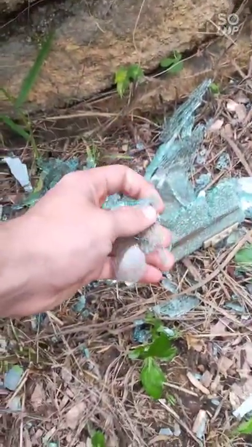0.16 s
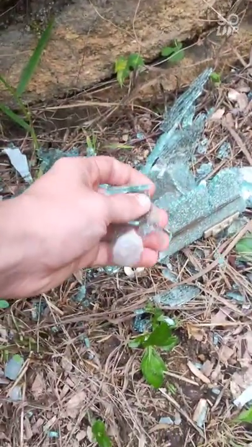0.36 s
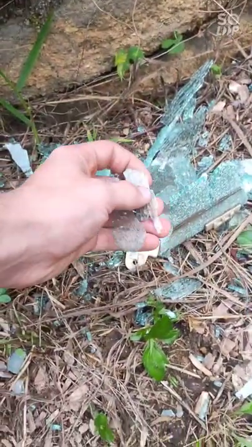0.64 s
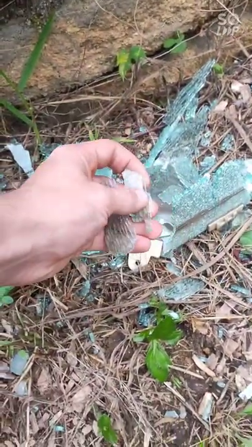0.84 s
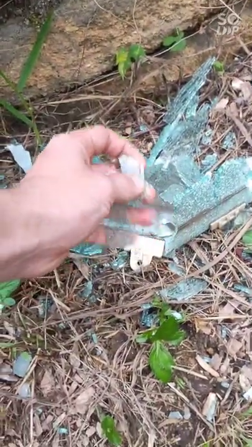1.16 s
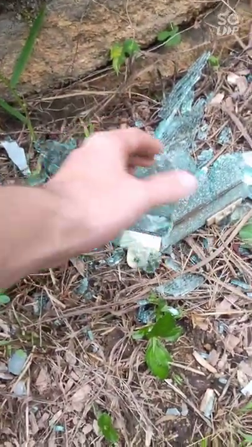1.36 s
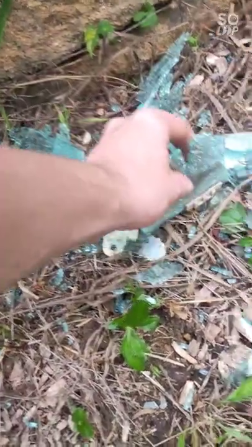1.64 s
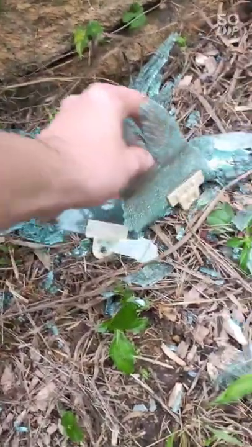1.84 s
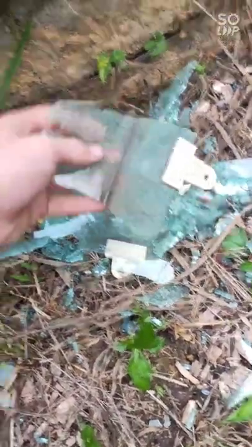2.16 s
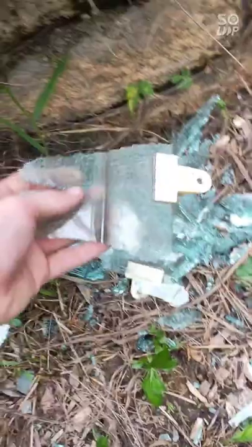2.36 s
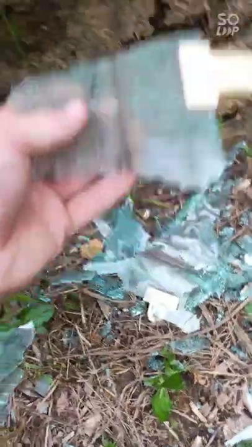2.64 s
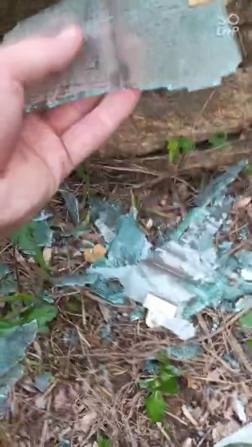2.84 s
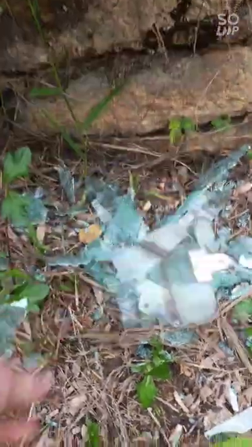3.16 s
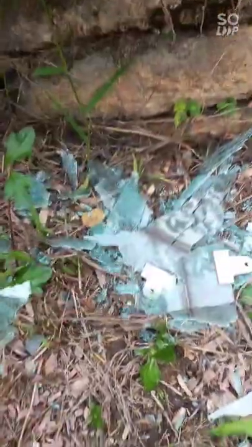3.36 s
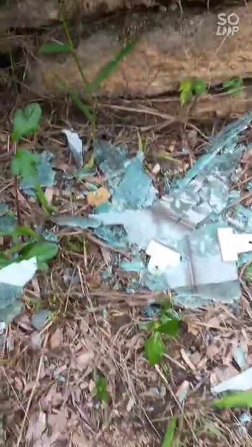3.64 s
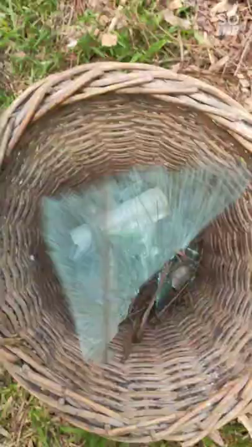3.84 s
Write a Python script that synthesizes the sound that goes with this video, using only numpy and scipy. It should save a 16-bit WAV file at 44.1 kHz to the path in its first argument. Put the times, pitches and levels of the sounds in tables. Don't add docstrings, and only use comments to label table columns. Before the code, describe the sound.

Broken laminated glass crackles in a hand close to the microphone outdoors, drops clinking onto shards, then after quiet ticks a larger sheet smashes down and crumbs briefly settle.

```python
import sys
import numpy as np
from scipy import signal
from scipy.fft import rfft, irfft
from scipy.io import wavfile
from scipy.ndimage import uniform_filter1d, minimum_filter1d

SR = 44100
rng = np.random.default_rng(int(sys.argv[2]) if len(sys.argv) > 2 else 0)


def makeup_ratio(level_db):
    decades = np.asarray(level_db, float) / 20
    return 10 ** decades


def log_audio(samples):
    frames = np.atleast_2d(samples).T
    limited = np.clip(frames, -1, 1)
    pcm = np.round(limited * 32767).astype(np.int16)
    wavfile.write(sys.argv[1], SR, pcm)


N = 176400
PIECE = 4000


def rms_one(x):
    return x / np.sqrt(np.mean(x ** 2) + 1e-20)


def curve(rows, outside=None):
    s, db = np.transpose(rows)
    return np.interp(np.arange(N) / SR, s, db, outside, outside)


def band(x, low_hz, high_hz):
    return signal.sosfilt(signal.butter(3, [low_hz, high_hz], "band", fs=SR, output="sos"), x)


def colour(x, spectrum):
    hz, db = np.transpose(spectrum)
    grid_hz = np.maximum(np.arange(2049) * SR / 4096, 1)
    gain_db = np.interp(np.log(grid_hz), np.log(hz), db)
    cepstrum = irfft(np.log(makeup_ratio(gain_db)))
    cepstrum[1:2048] *= 2
    cepstrum[2049:] = 0
    kernel = irfft(np.exp(rfft(cepstrum)))
    kernel = kernel / np.sqrt(np.sum(kernel ** 2))
    if x.ndim > 1:
        kernel = kernel[None]
    return signal.fftconvolve(x, kernel, axes=-1)[..., :x.shape[-1]]


def ring(x, hz, t60_s):
    r = makeup_ratio(-60 / (t60_s * SR))
    w = 2 * np.pi * min(hz, 16000) / SR
    return signal.lfilter([0, np.sin(w)], [1, -2 * r * np.cos(w), r * r], x + 1e-18)


def grains(shape, per_s, spread_db):
    size = makeup_ratio(spread_db * np.minimum(rng.exponential(1, shape), 4))
    sign = rng.choice([-1, 1], shape)
    return rms_one(size * sign * (rng.random(shape) < per_s / SR))


def drift(hz):
    r = np.exp(-2 * np.pi * hz / SR)
    noise = rng.standard_normal(N + SR)
    return rms_one(signal.lfilter([1], [1, -2 * r, r * r], noise)[SR:])


def pair(alike):
    mid, side = rng.standard_normal((2, N))
    return np.sqrt((1 + alike) / 2) * mid + np.sqrt((1 - alike) / 2) * side * np.array([[1], [-1]])


def place(pieces):
    out = np.zeros(N + PIECE)
    for s, db, sound in pieces:
        start = int(s * SR)
        out[start:start + PIECE] += makeup_ratio(db) * sound / np.abs(sound).max()
    return out[:N]


def port(x, bumps):
    for hz, width_hz, db in bumps:
        a, w = makeup_ratio(db / 2), 2 * np.pi * hz / SR
        al, c = np.sin(w) * width_hz / hz / 2, -2 * np.cos(w)
        x = signal.lfilter([1 + al * a, c, 1 - al * a], [1 + al / a, c, 1 - al / a], x)
    return x


# centre in Hz, width in Hz, level in dB.
RIGHT_PORT_BUMPS = [(230, 400, 3.5), (4300, 1900, -8), (6570, 3340, 13.5), (12300, 5900, 4.5)]


def ports(left, right):
    left_db = 4
    return np.array([makeup_ratio(left_db) * left, makeup_ratio(-left_db) * port(right, RIGHT_PORT_BUMPS)])


# frequency in Hz, level in dB.
HISS_SPECTRUM = [(59, -14), (100, -6), (166, -12.5), (452, -12), (1330, -18), (2320, -15), (2520, -17),
                 (13200, -30.5), (16000, -44.5)]
# time in seconds, level in dB.
HISS_SWELL = [(0, 3), (3.3, 4.5), (3.8, 0)]
# time in seconds, level in dB.
BREEZE_GUSTS = [(0, -68.5), (.25, -59.5), (.32, -67), (.42, -50.5), (.6, -69), (1.0, -62.5), (1.55, -69.5),
                (1.68, -54), (1.9, -71), (2.2, -62.5), (2.7, -77), (2.92, -63), (3.85, -75.5), (4, -69)]


def outdoors():
    hiss_db, split_hz = -73, 500
    chirr_db, chirr_hz, chirr_width_hz = -88, 2280, 150
    breeze_top_hz, breeze_left_db = 48, 3.0
    hiss = band(pair(.85), 40, split_hz) + band(pair(0.11), split_hz, 10000)
    hiss = hiss + makeup_ratio(1.7 * drift(5.9) - 4) * band(pair(0.74), 9100, 22000)
    hiss = makeup_ratio(hiss_db + curve(HISS_SWELL)) * colour(hiss, HISS_SPECTRUM)
    chirr = port(band(pair(.3), 1800, 2900), [(chirr_hz, chirr_width_hz, 18)])
    chirr = makeup_ratio(chirr_db + 2.1 * drift(7.1)) * rms_one(chirr)
    breeze_band = signal.butter(2, [6, breeze_top_hz], "band", fs=SR, output="sos")
    breeze = rms_one(signal.sosfilt(breeze_band, pair(.8)))
    breeze = makeup_ratio(curve(BREEZE_GUSTS) + 1.2 * drift(4.1)) * breeze
    return ports(*(hiss + chirr)) + breeze * makeup_ratio(breeze_left_db * np.array([[1], [-1]]))


def tinkles():
    sizes, ring_cycles = 18, 70
    clicks = grains(N, per_s=700, spread_db=3.0)
    dealt = rng.integers(0, sizes, N)
    pitches_hz = np.geomspace(1100, 14500, sizes) * rng.uniform(1.0, 1.05, sizes)
    out = np.zeros(N)
    for k, hz in enumerate(pitches_hz):
        out += rms_one(ring(clicks * (dealt == k), hz, ring_cycles / hz)) * np.sqrt(hz)
    return rms_one(out)


def crunch(rows, per_s, spectrum, lump_db, lump_hz, tinkle_db):
    grit = grains(N, per_s, spread_db=1.0) + makeup_ratio(tinkle_db) * tinkles()
    return makeup_ratio(curve(rows, -150) + lump_db * drift(lump_hz)) * colour(grit, spectrum)


# time in seconds, level in dB.
RUB_LEVEL = [(0, -92), (.2, -80.5), (.7, -68), (.8, -63.5), (.88, -82), (1.05, -67.5), (1.25, -78.5),
             (1.4, -67.5), (1.47, -56), (1.55, -58), (1.65, -61), (1.72, -75.5), (1.9, -69.5),
             (2.05, -62.5), (2.2, -77.5), (3.2, -96)]
# frequency in Hz, level in dB.
GRIT_SPECTRUM = [(500, -42), (900, -8), (3800, 1.5), (7000, -6), (14500, -13), (16000, -24)]


def rubbing():
    return crunch(RUB_LEVEL, 6400, GRIT_SPECTRUM, lump_db=2.5, lump_hz=29.7, tinkle_db=-3.0)


# frequency in Hz, level in dB.
CRACK_SPECTRUM = [(1200, -51.5), (2300, -2), (4200, 3.5), (5500, 4.5), (7000, 0), (9000, -8.5),
                  (16000, -45)]
# frequency in Hz, level in dB, t60 in seconds.
SHEET_MODES = [(980, 1.5, .012), (1126, 7, 0.0098), (1630, -0.5, .007), (1883, 2.5, 0.0054),
               (2400, 0.5, .007)]


def contacts(rows):
    rise_ms, crack_ms, tail_db, tail_ms = .5, 2.7, -22, 19
    ms = np.arange(PIECE) * 1000 / SR
    decay = np.exp(-ms / crack_ms) + makeup_ratio(tail_db) * np.exp(-ms / tail_ms)
    shape = (1 - np.exp(-ms / rise_ms)) * decay
    cracks = shape * grains((len(rows), PIECE), per_s=11000, spread_db=3.0)
    pieces = []
    for (s, db, sheet_db, fine_db), crack in zip(rows, cracks):
        start_s = s - rise_ms / 1000
        sheet = np.zeros(PIECE)
        for hz, mode_db, t60_s in SHEET_MODES:
            sheet += makeup_ratio(mode_db + rng.normal(0, 1.8)) * ring(crack, hz, t60_s)
        pieces.append((start_s, db - 6.5, colour(crack, CRACK_SPECTRUM)))
        pieces.append((start_s, db + fine_db + 3, band(crack, 9020, 15530)))
        pieces.append((start_s, db + sheet_db - 0.5, band(sheet, 897, 6000)))
    return place(pieces)


# start in seconds, peak in dB.
CRUMB_TICK_EVENTS = [(.042, -58), (.7274, -44), (.8689, -53), (1.0999, -52), (1.1792, -53), (1.2614, -60),
                     (1.2885, -57), (1.4355, -46), (1.4845, -38), (1.8754, -62), (2.0018, -57.5),
                     (2.0444, -58), (2.4194, -58), (3.0859, -58), (2.61, -59), (3.3594, -48), (3.3792, -42),
                     (3.4014, -48), (3.4774, -51.5), (3.5114, -59), (3.8452, -62)]


def crumb_ticks():
    return contacts([(s, db, -29, -7.5) for s, db in CRUMB_TICK_EVENTS])


# start in seconds, peak in dB, sheet share in dB, fine share in dB.
CRUMPLE_CRACKS = [(0.0914, -49.5, -38, -5.5), (0.1416, -48, -24, -6.5), (0.1692, -48, -25, -2),
                  (0.1902, -37, -20.5, -5.5), (0.2537, -40, -27, -14), (0.41, -39, -36, -19),
                  (0.4623, -41, -39, -23), (0.5006, -44, -12.5, -13), (0.5347, -43.5, -32, -12),
                  (0.575, -45, -21, -17), (0.605, -38, -29, -13), (0.6626, -34.5, -25.5, -21),
                  (0.6959, -43, -22, -9.5), (0.713, -18, -36, -20), (0.7756, -36, -14.5, -26),
                  (0.802, -38, -23, -22), (0.8135, -36.5, -20, -18), (0.9364, -29, -26, -14.5),
                  (1.0177, -36, -29, -11), (1.022, -27, -22, -25), (1.0322, -23.5, -34, -20),
                  (1.058, -36, -24, -31), (1.1164, -38.5, -27, -11), (1.1327, -37, -12.5, -16)]


def crumpling():
    return contacts(CRUMPLE_CRACKS)


# start in seconds, peak in dB, pitch in Hz, t60 in seconds.
CLINK_EVENTS = [(.253, -55, 9460, 0.035), (0.252, -45.5, 3800, .015), (0.306, -61, 9540, .025),
                (.375, -65, 9460, 0.016), (.461, -56, 9440, .02), (.535, -44.5, 3680, 0.028),
                (.606, -47, 6150, 0.0089), (.695, -45, 3650, 0.017), (.713, -29, 4700, 0.014),
                (0.712, -39, 2280, .01), (0.939, -44.5, 7030, 0.012), (.962, -60, 6940, 0.025),
                (1.033, -44.5, 2280, 0.018), (1.323, -53, 3770, .04), (1.322, -56, 6610, 0.02),
                (1.353, -49, 7400, .02), (1.386, -53, 7160, 0.028), (1.409, -27, 2810, 0.029),
                (1.411, -37, 880, 0.041), (1.412, -40.5, 1910, 0.029), (1.451, -32, 3500, .025),
                (1.449, -41, 11230, 0.011), (1.485, -40.5, 8560, .03), (1.508, -33, 3400, 0.011),
                (1.511, -52, 8750, .035), (1.526, -47.5, 7166, .045), (1.598, -49, 14360, 0.036),
                (1.608, -44.5, 1900, .015), (1.648, -46, 3350, 0.029), (1.696, -60.5, 7620, .015),
                (1.793, -59.5, 9850, 0.032), (1.934, -59, 7080, .015), (1.935, -54, 4360, 0.018),
                (1.98, -62, 12500, .015), (2.049, -50, 3280, 0.025), (2.057, -57, 3280, .015),
                (2.056, -54.5, 2400, 0.034), (2.081, -48.5, 2390, .015), (2.11, -57.5, 12500, .012),
                (3.269, -25.5, 6970, 0.031), (3.268, -35, 3100, 0.028), (3.267, -36, 3560, .02),
                (3.27, -36, 1093, .015), (3.268, -36, 5500, .02), (3.269, -30, 8300, .025),
                (3.27, -38, 2440, .025), (3.379, -47, 12500, .015), (3.379, -49, 1450, 0.017),
                (3.505, -66, 14400, 0.049)]


def clinks():
    scrape_ms = 5
    fade = np.exp(-np.arange(PIECE) * 1000 / SR / scrape_ms)
    scrapes = fade * grains((len(CLINK_EVENTS), PIECE), per_s=11000, spread_db=0.0)
    return place([(s, db, ring(scrape, hz, t60_s))
                  for (s, db, hz, t60_s), scrape in zip(CLINK_EVENTS, scrapes)])


# start in seconds, peak in dB, sheet share in dB, fine share in dB.
PILE_HITS = [(1.323, -51, -24, -12), (1.353, -36.5, -48, -22), (1.363, -27, -58, -15.5),
             (1.384, -47.5, -32, -34), (1.409, -19.5, -10.5, -19), (1.413, -41, 5, 2),
             (1.449, -25, -6, -7.5), (1.453, -29, -18, -21), (1.482, -31, -11, -26), (1.508, -31, -11, -20),
             (1.525, -30, -11.5, -15), (1.566, -34, -38, -12), (1.596, -26, -15.5, -15.5),
             (1.607, -37, -4, -17), (1.625, -40, -12, -17), (1.655, -39, -14, -14), (1.693, -46, -8, -20),
             (1.936, -40.5, -23, -34), (2.082, -55.5, -3, -19)]


def pile():
    return contacts(PILE_HITS)


# start in seconds, peak in dB.
LIFT_TICKS = [(1.7906, -44.5), (1.823, -47), (2.1114, -54), (2.277, -51), (2.3957, -48.5), (2.478, -45),
              (2.5336, -49), (2.7267, -45.5), (2.913, -52.5), (3.0653, -53.5), (3.193, -53.5),
              (3.5932, -53.5)]


def lifting():
    return contacts([(s, db, -29, -11) for s, db in LIFT_TICKS])


# time in seconds, level in dB.
LANDING_LEVEL = [
    (3.259, -55),
    (3.263, -41),
    (3.266, -21.5),
    (3.274, -18),
    (3.279, -30),
    (3.286, -38.5),
    (3.3, -45),
]
# frequency in Hz, level in dB.
SMASH_SPECTRUM = [(60, -32), (170, -18), (600, -18), (1000, 0), (2200, 0), (3600, 3), (7000, 1),
                  (12500, -11), (16200, -22)]


def landing():
    return crunch(LANDING_LEVEL, 12000, SMASH_SPECTRUM, lump_db=-0.5, lump_hz=300, tinkle_db=-19.0)


# time in seconds, level in dB.
SETTLING_LEVEL = [
    (3.278, -60),
    (3.288, -46.5),
    (3.32, -54),
    (3.35, -56.5),
    (3.38, -52.5),
    (3.41, -59),
    (3.45, -66),
    (3.52, -72),
    (3.65, -91.5),
]
# frequency in Hz, level in dB.
CRUMB_SPECTRUM = [(450, -39.5), (1100, -4.5), (2000, -6.5), (3800, -2), (7000, -7.5), (13000, -12.5),
                  (16000, -17)]


def settling():
    return crunch(SETTLING_LEVEL, 8000, CRUMB_SPECTRUM, lump_db=1.5, lump_hz=58.8, tinkle_db=-9.5)


def heard(x):
    turn_hz, turn_width_hz = 3500, 2400
    scatter_db, scatter_ms, scatter_hz = -7.5, 1.5, 5000
    bounce_db, bounce_samples = -8.5, 161
    w = 2 * np.pi * turn_hz / SR
    al, c = np.sin(w) * turn_width_hz / turn_hz / 2, -2 * np.cos(w)
    turned = signal.lfilter([1 - al, c, 1 + al], [1 + al, c, 1 - al], x)
    echoes = rng.standard_normal(400) * np.exp(-np.arange(400) * 1000 / SR / scatter_ms)
    echoes = echoes / np.sqrt(np.sum(echoes ** 2))
    scatter = makeup_ratio(scatter_db) * signal.fftconvolve(band(x, scatter_hz, 19000), echoes)[:N]
    bounce = makeup_ratio(bounce_db) * np.roll(x, bounce_samples)
    return ports(x + scatter, turned - scatter + bounce)


def scene():
    hand = rubbing() + crumb_ticks() + crumpling() + clinks() + pile() + lifting()
    throw = landing() + settling()
    return outdoors() + heard(hand + throw)


def gate(x):
    treble_hz, top_hz, weak_db = 8200, 12900, -2.5
    quiet_share, shut_share = .8, .3
    hz, _, z = signal.stft(x, SR, nperseg=2048)
    power = np.abs(z.sum(axis=0)) ** 2
    around = uniform_filter1d(power, size=61, axis=0)
    weak = uniform_filter1d(power, size=5, axis=0) < makeup_ratio(2 * weak_db) * around
    treble = power[hz > treble_hz].sum(axis=0)
    top = power[hz > top_hz].sum(axis=0)
    slivers = weak & (hz > treble_hz)[:, None] & (treble < np.quantile(treble, quiet_share))
    shut = (hz > top_hz)[:, None] & (top < np.quantile(top, shut_share))
    return x - signal.istft(z * (slivers | shut), SR, nperseg=2048)[1][:, :N]


def hush(x):
    treble_hz, ahead_s, rise_db = 5500, .015, 18
    high = signal.sosfiltfilt(signal.butter(2, treble_hz, "high", fs=SR, output="sos"), x)
    level = np.sqrt(uniform_filter1d(np.mean(high ** 2, axis=0), size=90) + 1e-14)
    span = int(ahead_s * SR)
    coming = np.roll(-minimum_filter1d(-level, size=span), -span // 2)
    keep = np.clip(level / coming * makeup_ratio(rise_db), 0, 1) ** 3
    return x - high * (1 - uniform_filter1d(keep, size=60))


def roll_off(x):
    return signal.sosfilt(signal.butter(12, 16510, fs=SR, output="sos"), x)


def record(dry):
    cut = signal.sosfilt(signal.cheby2(10, 30, 16000, fs=SR, output="sos"), dry)
    return roll_off(hush(gate(cut)))


dry = scene()
out = record(dry)
log_audio(out)
```